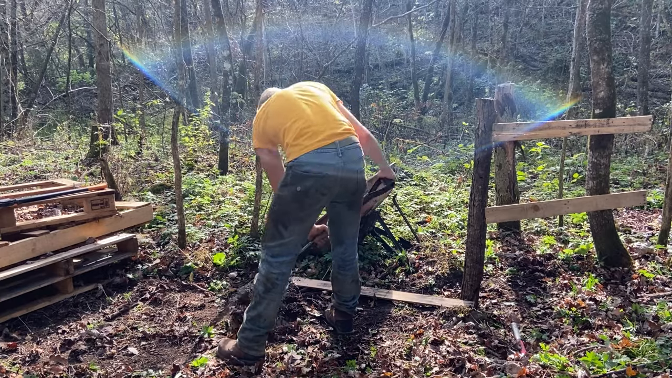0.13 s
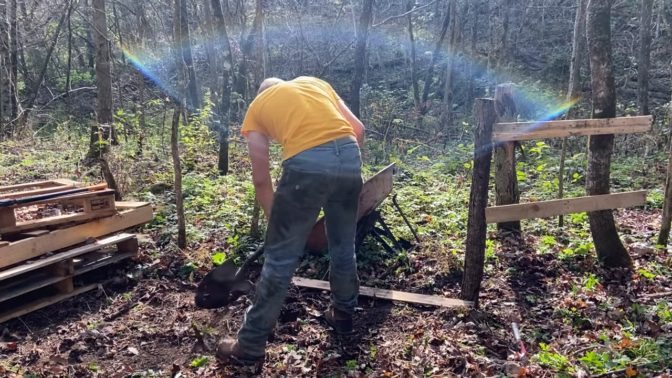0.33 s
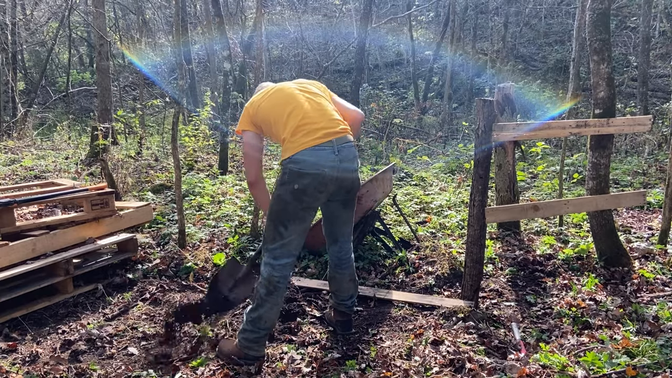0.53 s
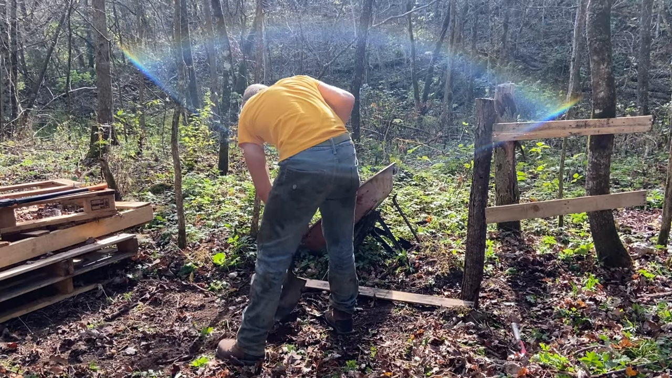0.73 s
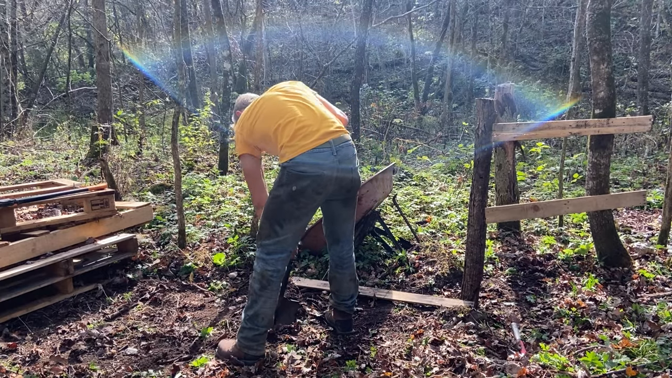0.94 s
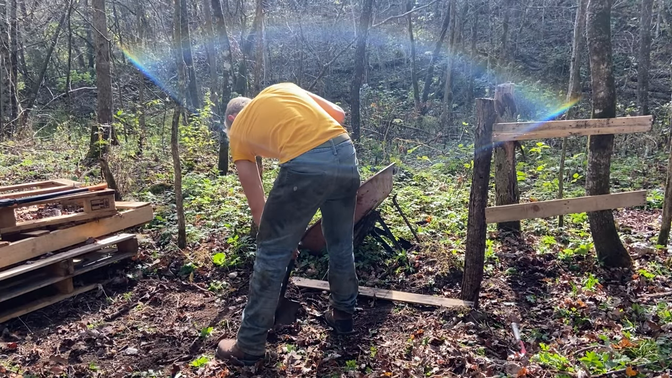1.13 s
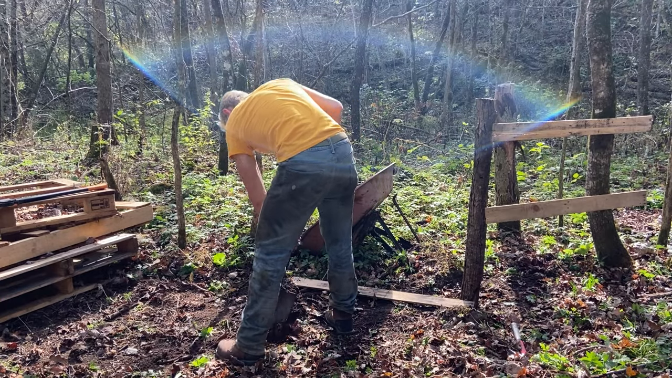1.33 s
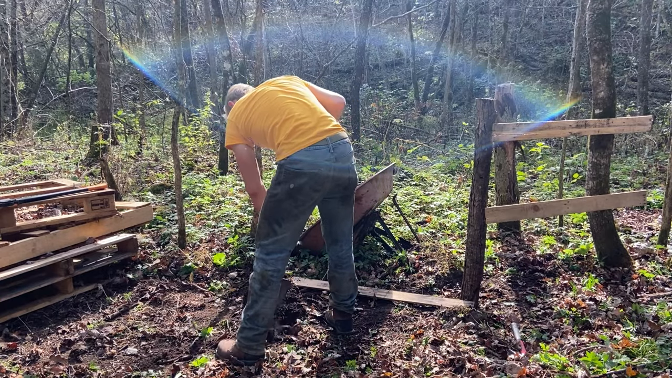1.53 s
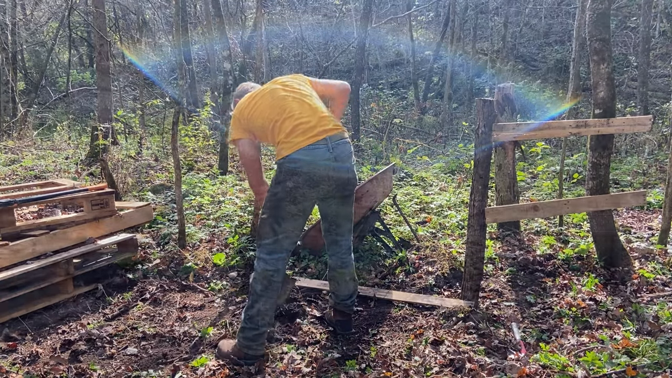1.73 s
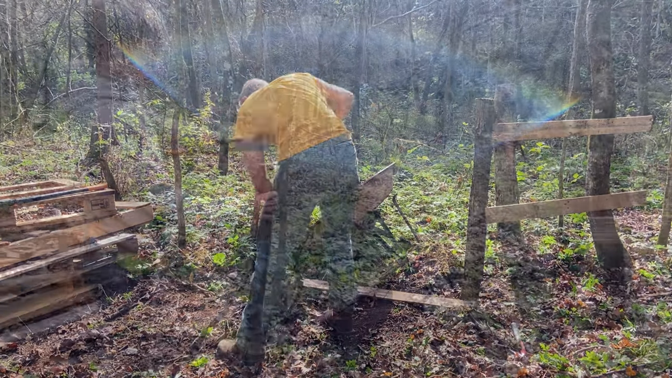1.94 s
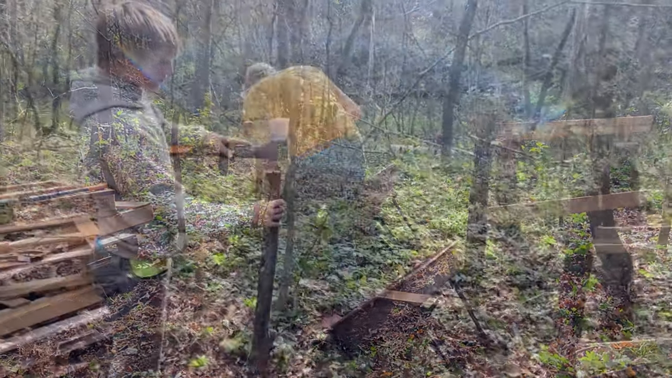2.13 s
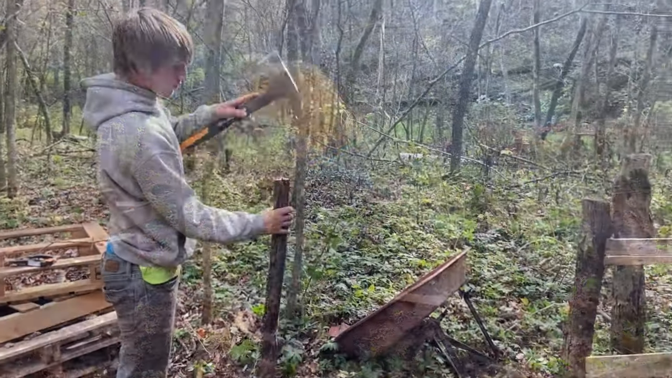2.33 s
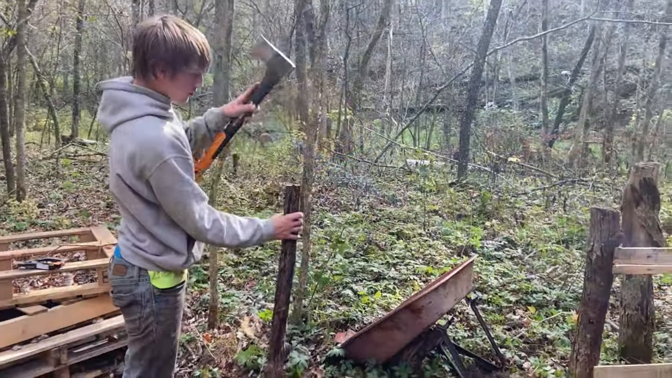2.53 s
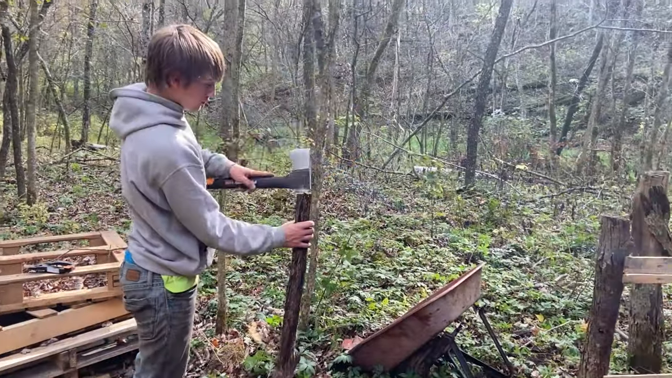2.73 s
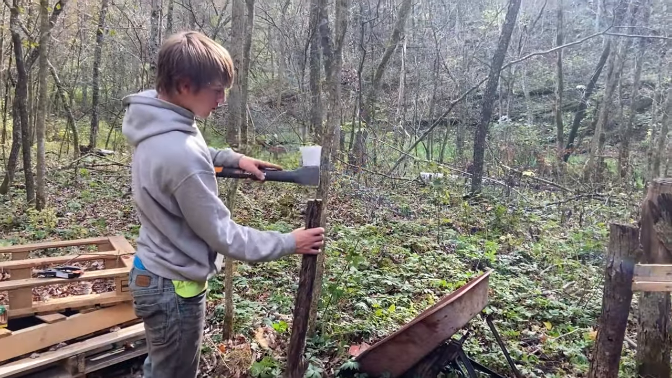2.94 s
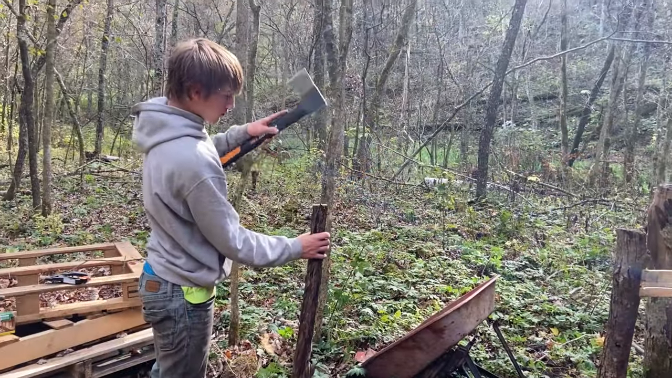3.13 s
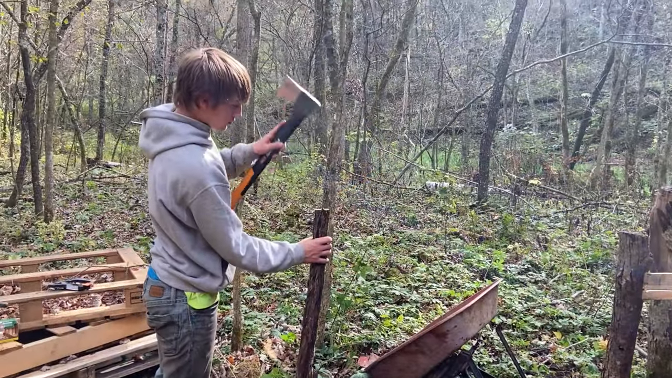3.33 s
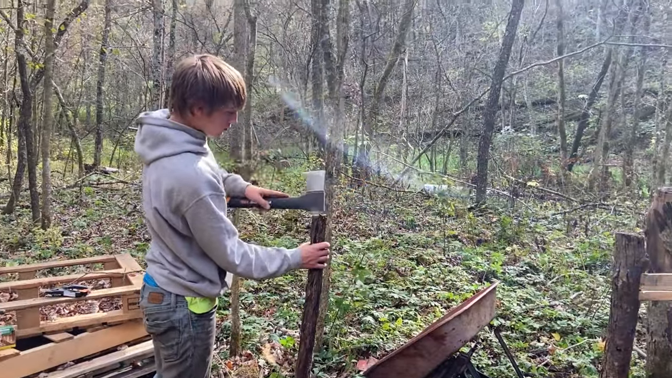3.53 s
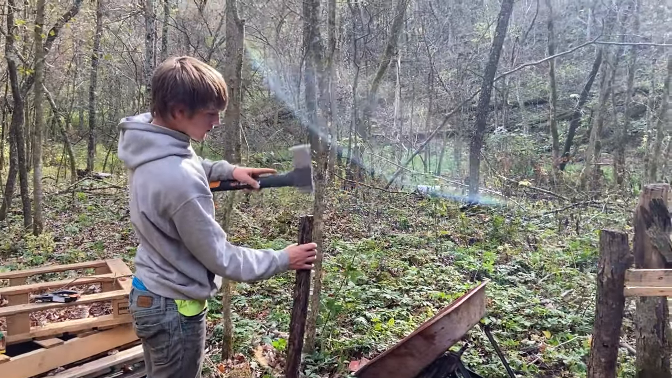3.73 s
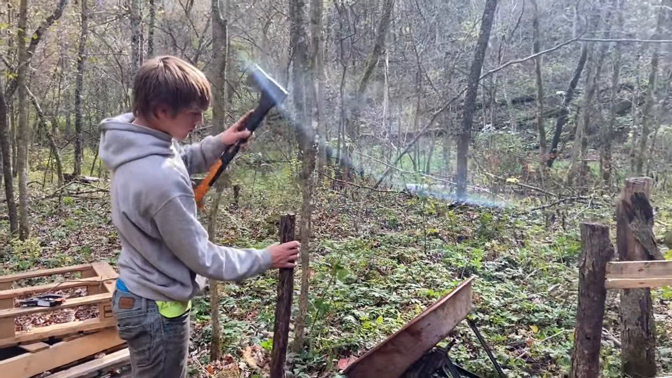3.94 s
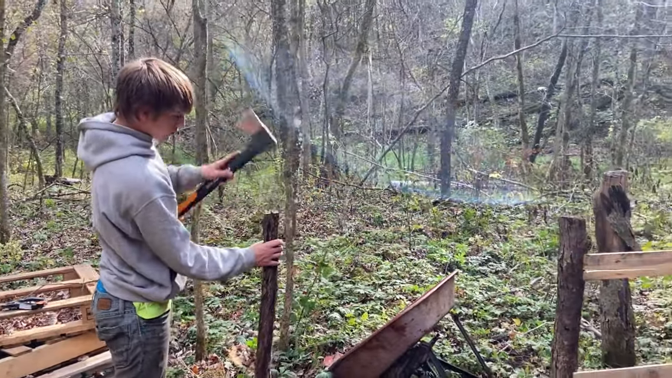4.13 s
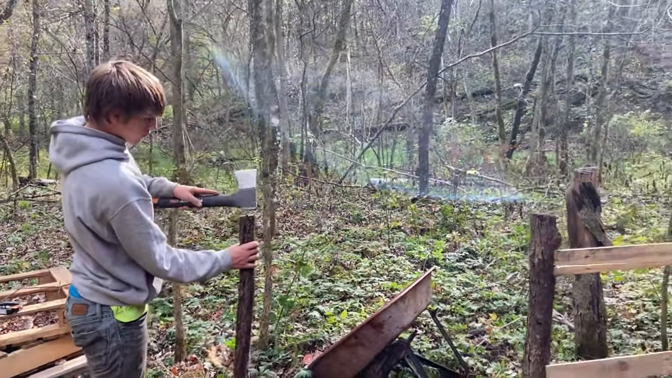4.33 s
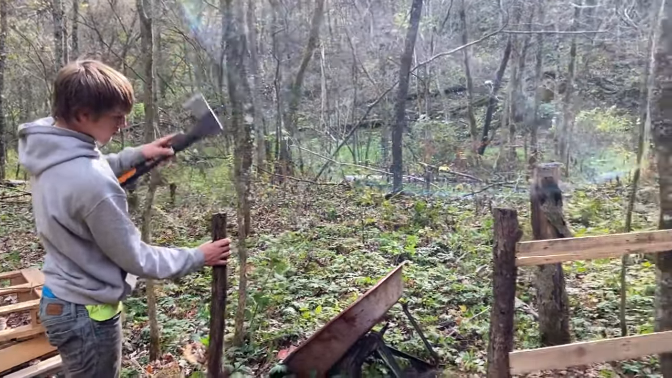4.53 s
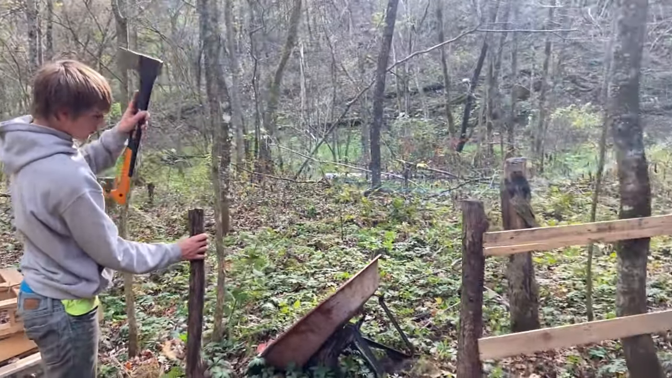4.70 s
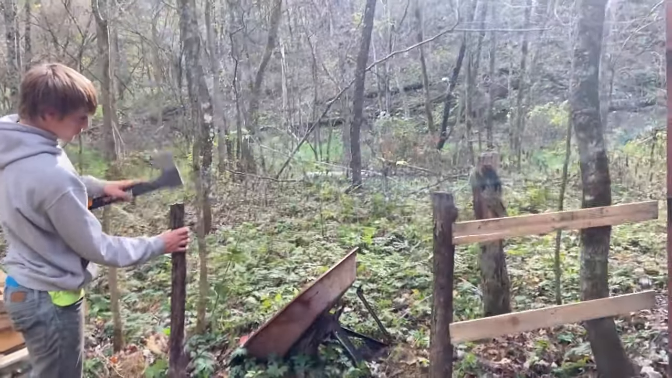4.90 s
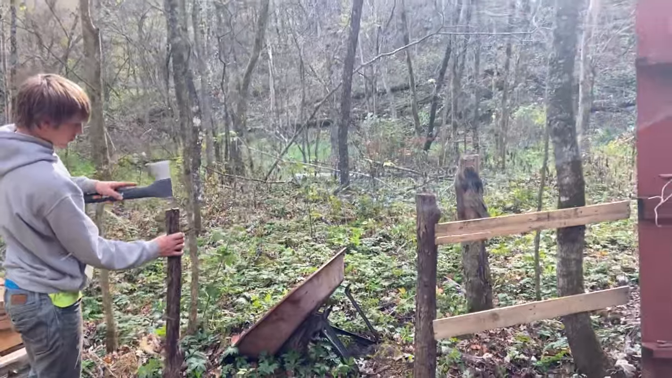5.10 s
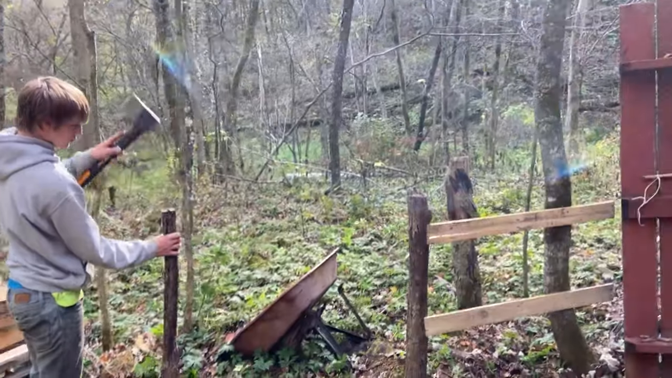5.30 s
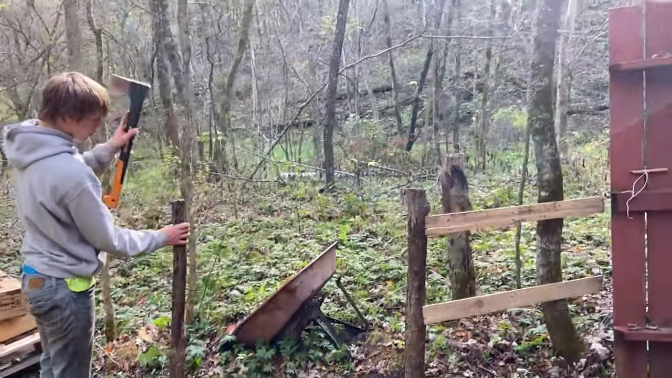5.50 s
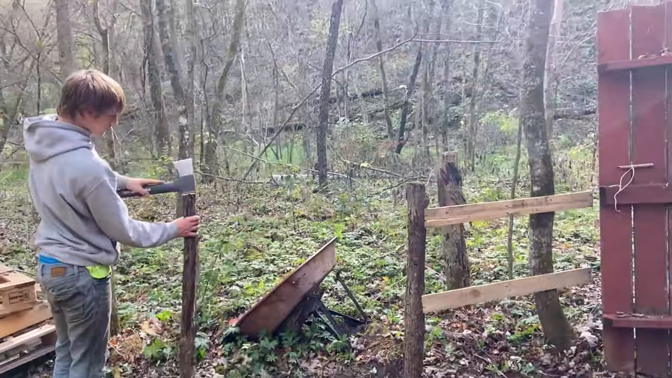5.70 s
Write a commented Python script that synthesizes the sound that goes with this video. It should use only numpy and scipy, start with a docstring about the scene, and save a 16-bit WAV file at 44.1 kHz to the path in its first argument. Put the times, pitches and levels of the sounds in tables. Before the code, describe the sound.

A spade thuds once into soil among softly rustling dry leaves. Then a hatchet drives a wooden post with six evenly paced blows, the first softer, each a sharp knock with a brief woody ring and a thin echo off the trees. Between them, feet and tools stir leaves, snap twigs and bump hollow wood. The stereo microphone is close, with a faint distant rumble behind.

```python
"""A hatchet drives a wooden post with six blows, close to a stereo microphone in a wood.
Each blow rings the post briefly, a low wave follows through the ground and the trunks scatter
a thin tail. Before the first blow a spade thuds into soil. Feet and tools rustle dry leaves,
snap twigs and knock on hollow wood, over a low distant rumble."""
import sys
import numpy as np
from scipy import signal
from scipy.fft import rfft, irfft, next_fast_len
from scipy.io import wavfile

SR = 44100
rng = np.random.default_rng(int(sys.argv[2]) if len(sys.argv) > 2 else 0)


def persist_wave(psi):
    """Save psi, clipped to +-1, as 16-bit WAV."""
    counts = np.round(np.clip(psi, -1, 1) * 32767).astype(np.int16)
    wavfile.write(sys.argv[1], SR, np.atleast_2d(counts).T)


N = 258426

# the ambience of the place: time_s, leaves_db, dragging_db, rumble_db, leaves_pan_db
AMBIENCE = [(0, -72, -63.5, -63, -1.5), (.9, -64.5, -64.5, -61, -0.5), (1.1, -75, -63.5, -61.5, -3),
            (1.4, -66.5, -64.5, -61.5, -1), (1.75, -76, -66.5, -63.5, -3), (2.1, -68, -69, -67.5, -1),
            (2.5, -69.5, -65, -61, -2), (3.0, -71.5, -66, -58.5, -3.5), (3.5, -68.5, -65, -56.5, -2.5),
            (4.0, -74.5, -65, -53.5, -3.5), (4.55, -62.5, -55.5, -55.5, -6.5), (5.1, -63.5, -57.5, -60, -3),
            (5.5, -53.5, -60.5, -52.5, -4), (5.86, -65, -54.5, -51.5, -3.5)]


def from_db(db):
    """Decibels to gain."""
    return 10 ** (np.asarray(db) / 20)


def rms_one(x):
    """Scale to rms 1."""
    return x / np.sqrt(np.mean(x ** 2) + 1e-20)


def at_peak(x, db):
    """Scale to a peak of db."""
    return from_db(db) * x / np.abs(x).max()


def high_pass(x, hz):
    """Cut below hz."""
    return signal.sosfilt(signal.butter(2, hz, "high", fs=SR, output="sos"), x)


def band_pass(x, low_hz, high_hz, order):
    """Keep what lies between two frequencies."""
    edges = [low_hz, min(high_hz, .45 * SR)]
    return signal.sosfilt(signal.butter(order, edges, "band", fs=SR, output="sos"), x)


def in_time(rows):
    """Read (time_s, value, ..) rows as curves, one value a sample."""
    times, *columns = np.transpose(rows)
    return [np.interp(np.arange(N) / SR, times, c) for c in columns]


def at_hz(rows, hz):
    """Read (frequency_hz, value, ..) rows on a log-frequency axis."""
    freqs, *columns = np.transpose(rows)
    return np.squeeze([np.interp(np.log(hz), np.log(freqs), c) for c in columns])


def add(out, start_s, sound, pan_db=0):
    """Mix a sound in; pan_db is left minus right."""
    at = round(start_s * SR)
    part = sound[:N - at]
    out[:, at:at + len(part)] += part * from_db([[pan_db / 2], [-pan_db / 2]])


def drift(rate_hz):
    """A smooth random wander of rms 1."""
    pole = np.exp(-80 * np.pi * rate_hz / SR)
    white = rng.standard_normal(N // 40 + 2002)
    slow = signal.lfilter([1], [1, -2 * pole, pole * pole], white)[2000:]
    return np.interp(np.arange(N) / 40, np.arange(len(slow)), rms_one(slow))


def bands(low_hz, high_hz, size):
    """Yield the centre, a mid noise and a side noise for each half-octave band."""
    edges = low_hz * 2 ** np.arange(0, np.log2(high_hz / low_hz) + .5, .5)
    white = rng.standard_normal((2, 2, size))
    for k, (low, high) in enumerate(zip(edges, np.minimum(edges[1:], .45 * SR))):
        yield np.sqrt(low * high), *band_pass(white[k % 2], low, high, order=2)


def spread(mid, side, hz, pan_db=0):
    """Mid and side to left and right; direction shows where the microphone body shades a port."""
    # the microphone's stereo image: frequency_hz, left_right_likeness, pan_factor
    image = [(60.4, 1, 0), (300, 0.51, 0.3), (1200, 0.19, 2), (2320, 0.77, 1.75), (3500, 0.39, 0.8846),
             (5475, 0.12, 5), (7270, 1, -1), (14000, 1, 0.03)]
    alike, pan_factor = at_hz(image, hz)
    pair = np.sqrt(1 + alike) * mid + np.sqrt(1 - alike) * side * [[1], [-1]]
    return pair * from_db(np.outer([.5, -.5], pan_factor * pan_db))


def noise(spectrum, patchy_db, grain_db, pan_db=0):
    """Stereo noise of rms 1 with slow patches in each band and a shared fast crackle."""
    out, crackle = 0, drift(rate_hz=210)
    for hz, mid, side in bands(spectrum[0][0], spectrum[-1][0], size=N):
        level_db = at_hz(spectrum, hz) + patchy_db * drift(rate_hz=10.5) + grain_db * crackle
        out = out + from_db(level_db) * spread(mid, side, hz, pan_db)
    return rms_one(out)


def burst(hz, decay_s, rise_s, width=2.2):
    """A crunch of noise from hz / width to hz * width, with the energy of rms 1 held for decay_s."""
    t = np.arange(SR // 10) / SR
    envelope = (1 - np.exp(-t / rise_s)) * np.exp(-t / decay_s)
    grit = band_pass(rng.standard_normal(len(t)) * envelope, hz / width, hz * width, order=1)
    return grit / np.sqrt(np.sum(grit ** 2) / (decay_s * SR))


def ring(force, hz, t60_s):
    """One mode: a unit click sets off a dying sine of height about 1."""
    pole, angle = from_db(-60 / (t60_s * SR)), 2 * np.pi * hz / SR
    return signal.lfilter([0, np.sin(angle)], [1, -2 * pole * np.cos(angle), pole * pole], force + 1e-18)


def struck(modes, contact_s, jolts_db, scatter_db, detune):
    """A few jolts drive every mode; grip and spot shift strengths and pitches from blow to blow."""
    force = np.zeros(SR // 2)
    jolt_at = (np.linspace(0, contact_s, len(jolts_db)) * SR).astype(int)
    force[jolt_at] = from_db(jolts_db)
    force = signal.lfilter([.3], [1, -.7], force)
    body = 0
    for k, (hz, db, t60_s) in enumerate(modes):
        louder, higher = rng.standard_normal(2)
        mode = ring(force, hz * (1 + detune * higher), t60_s)
        body = body + (-1) ** k * from_db(db + scatter_db * louder) * mode
    return high_pass(body, 170)   # a small body radiates no deep bass


def distant_rumble():
    """Low noise from far off, slowly rising and falling."""
    # rumble spectrum: frequency_hz, relative_density_db
    spectrum = [(40, -10.5), (52, -0.5), (65, -4), (87, -3.5), (110, -6.5), (200, -16), (400, -25)]
    _, _, rumble_db, _ = in_time(AMBIENCE)
    return from_db(rumble_db) * noise(spectrum, patchy_db=1.5, grain_db=2.5)


def woodland_echo(x):
    """Near trunks return a quick dense scatter, far ones a longer tail, a stack of boards one slap."""
    # scatter off the trunks: frequency_hz, near_db, near_t60_s, far_db, far_t60_s
    trunks = [(200, -50, .1, -61.5, 0.967), (505, -42, 0.15, -71, 1), (985, -54.5, 0.13, -63.5, 0.83),
              (1460, -37.5, .1, -63.5, .84), (2010, -43.5, 0.094, -66, 0.95),
              (3200, -36.5, 0.085, -60, 0.8), (5000, -37.5, 0.082, -58.5, .45),
              (8000, -36.5, 0.1, -61, .35), (12100, -35.5, 0.077, -66.5, .3)]
    t, echo = np.arange(SR) / SR, 0
    for hz, mid, side in bands(165, 14000, size=SR):
        near_db, near_t60, far_db, far_t60 = at_hz(trunks, hz)
        near = from_db(near_db - 60 * t / near_t60) * (t > .006)   # first echo after 6 ms
        far = from_db(far_db - 60 * t / far_t60) * np.minimum(t / 0.076, 1) ** 2
        echo = echo + (near + far) * spread(mid, side, hz=940)   # equally wide in every band
    slap = from_db(-38) * ring(signal.unit_impulse(400), hz=1500, t60_s=0.002)
    add(echo, start_s=.018, sound=slap, pan_db=6.5)
    return signal.fftconvolve(high_pass(x, 180)[None], echo, axes=1)[:, :N]


def rustle():
    """Feet and tools sweep the woodland floor, stirring bright leaves and duller dragging together."""
    # spectra of dry leaves and of dragging: frequency_hz, relative_density_db
    leaf_spectrum = [(1000, 3.5), (2000, 4.5), (3500, 2), (5200, 1.5), (7000, 2), (9200, 8), (11500, -21.5),
                     (13500, -12), (15500, -20)]
    drag_spectrum = [(150, 1), (300, 1), (520, 2.5), (750, -0.5), (1050, 0.5), (1600, -10), (2600, -17.5),
                     (4000, -27)]
    # sweeps: time_s, leaves_db, dragging_db, rise_s, fall_s (per 20 dB; a negative fall keeps growing)
    sweeps = [(0.365, -50.5, -63.5, 0.2237, 0.21), (0.581, -52, -74.5, 0.2928, 0.247),
              (0.675, -48.5, -69.5, 0.1242, 0.0213), (1.191, -60.5, -61.5, 0.1143, 0.0756),
              (1.48, -63.5, -68.5, 0.22, 0.01), (2.17, -58, -76, 0.0538, 0.27),
              (2.28, -59.5, -70.5, 0.135, .12), (3.901, -62, -62.5, 0.17, 0.04),
              (4.06, -60, -66.5, 0.1061, 0.5), (4.39, -46.5, -52, 0.1376, 0.19),
              (4.46, -50, -54.5, 0.08, 0.0747), (4.662, -44.5, -51.5, 0.13, 0.1759),
              (4.778, -50.5, -49.5, 0.1142, 0.27), (5.05, -57, -67, 0.06, 0.53),
              (5.25, -53.5, -50, 0.18, 0.2559), (5.419, -47.5, -50, 0.34, 0.18),
              (5.61, -48.5, -55.5, 0.0436, 0.26), (5.759, -52.5, -57.5, 0.2965, -2.54)]
    leaf_db, drag_db, _, pan_db = in_time(AMBIENCE)
    t = np.arange(N) / SR
    powers = from_db([leaf_db, drag_db]) ** 2
    for time_s, *levels_db, rise_s, fall_s in sweeps:
        swell_db = -20 * np.maximum((time_s - t) / rise_s, (t - time_s) / fall_s)
        powers = powers + from_db(np.add.outer(levels_db, swell_db)) ** 2
    leaf_gain, drag_gain = np.sqrt(powers)
    leaves = leaf_gain * noise(leaf_spectrum, patchy_db=1.2, grain_db=1.5, pan_db=pan_db)
    dragging = drag_gain * noise(drag_spectrum, patchy_db=1.0, grain_db=2.0)
    return leaves + dragging


def twigs():
    """Twigs snap and leaves crunch underfoot, a little to the right, among fainter random ticks."""
    # snaps and crunches: start_s, peak_db, centre_hz, decay_s
    snaps = [(0.840, -44.5, 2060, 0.0154), (1.1573, -43.5, 2380, 0.0088), (1.1917, -50.5, 2010, 0.0074),
             (1.2146, -50.5, 2440, 0.0089), (1.3493, -50.5, 6360, 0.0043), (1.4895, -47.5, 1910, 0.0097),
             (1.558, -60, 4000, 0.0061), (2.1311, -51.5, 7170, 0.0063), (2.379, -42.5, 1530, 0.0102),
             (2.4209, -42, 2230, 0.0056), (2.5142, -42.5, 2380, 0.0053), (2.5204, -46, 1540, 0.0052),
             (3.0485, -51, 5350, 0.003), (3.0684, -47.5, 2690, 0.0018), (3.1224, -53.5, 5790, .002),
             (3.1318, -51, 7030, 0.00249), (3.2034, -56.5, 4000, .002), (3.3059, -45.5, 3220, 0.00136),
             (3.3454, -57, 4200, 0.00229), (3.8003, -43.5, 3500, 0.00174), (3.8327, -50.5, 2400, .004),
             (3.8836, -43, 2550, 0.0037), (3.904, -48, 1340, .008), (4.0392, -49, 3450, 0.00236),
             (4.6538, -36.5, 5170, .004), (4.7706, -37.5, 4500, 0.0031), (5.2794, -36.5, 1470, 0.0036),
             (5.4086, -34.5, 2080, 0.0047), (5.5374, -41, 1820, 0.0032)]
    out, ticks_per_s = np.zeros((2, N)), 5.6
    chance = rng.random((round(ticks_per_s * N / SR), 3))
    ticks = [(when * N / SR, -67 + 8 * size, 2500 * 3.0 ** pitch, .0012) for when, size, pitch in chance]
    for start_s, peak_db, hz, decay_s in [*snaps, *ticks]:
        snap = burst(hz, decay_s, rise_s=.001, width=1.5)
        add(out, start_s, at_peak(snap, peak_db), pan_db=-2)
    return out


def hollow_knocks():
    """A rough contact rings one mode of hollow wood."""
    # knocks of feet and tools: start_s, peak_db, pitch_hz
    knocks = [(0.84, -43, 188), (1.156, -51.5, 593.5), (1.211, -49, 596), (1.503, -50, 204),
              (2.425, -48, 506), (2.519, -51, 479.7), (3.725, -48.5, 556), (3.834, -46, 557.4),
              (3.904, -45, 558), (3.898, -42.5, 142.7), (4.045, -49.5, 520), (4.113, -53.5, 560),
              (4.531, -44.5, 597), (4.757, -44.5, 495), (4.826, -39.5, 503), (4.844, -44, 476),
              (5.215, -45.5, 541), (5.278, -42.5, 520.5), (5.367, -43.5, 549)]
    out = np.zeros((2, N))
    for start_s, peak_db, hz in knocks:
        contact = burst(hz, decay_s=0.0098, rise_s=0.004, width=1.8)
        add(out, start_s, at_peak(ring(contact, hz, t60_s=0.05), peak_db))
    return out


def ground_wave(rise_s, start_hz, end_hz, fall_s, t60_s):
    """Soil carries the highs first: a late swell whose pitch falls."""
    t = np.arange(SR // 2) / SR
    turns = end_hz * t + (start_hz - end_hz) * fall_s * (1 - np.exp(-t / fall_s))
    swell = (1 - np.exp(-(t / rise_s) ** 2)) * from_db(-60 * t / t60_s)
    return swell / swell.max() * np.sin(2 * np.pi * turns)


def spade():
    """A thud into earth: dull blade modes, crushed soil, grit on the edge and a ground wave."""
    # spade and heels in soil: start_s, peak_db, grit_db, ground_db
    thuds = [(0.841, -50.5, -50.5, -68), (0.949, -10.5, -49, -39), (1.492, -38.5, -74, -60.5),
             (5.45, -70.5, -55, -53.5)]
    # modes of the blade: pitch_hz, relative_db, t60_s
    blade_modes = [(205.2, 3.5, 0.0407), (340.3, 6, 0.0289), (416.3, 10.5, 0.0185), (569, -4, 0.0278),
                   (871, -7, 0.0393), (1083, -8, 0.033), (1417, -16, 0.03), (1876, -34, 0.036),
                   (2530, -37, 0.02)]
    out = np.zeros((2, N))
    wave = ground_wave(rise_s=0.021, start_hz=233.2, end_hz=78.5, fall_s=0.01755, t60_s=0.104)
    for start_s, peak_db, grit_db, ground_db in thuds:
        blade = struck(blade_modes, contact_s=0.002873, jolts_db=[-10, -3, 0], scatter_db=3, detune=0.0296)
        soil = burst(hz=370, decay_s=0.0082, rise_s=0.00074)
        grit = burst(hz=7100, decay_s=0.00366, rise_s=0.0012)
        add(out, start_s, at_peak(blade, peak_db))
        add(out, start_s + 0.002023, from_db(peak_db - 24) * soil)
        add(out, start_s, from_db(grit_db) * grit)
        add(out, start_s, from_db(ground_db) * wave)
    return out


def post(ring_db, upper_db, middle_db, lower_db, crack_db):
    """One contact: a splintering crack and four mode groups, each as strong as the spot struck allows."""
    # modes of the post: pitch_hz, relative_db, t60_s
    lengthwise = [(1045, 0, .034), (1115, -12, .03)]   # the main ring, split in two by the grain
    upper = [(1329.3, -3, 0.02), (1681.8, 5, 0.0086), (1964.5, -4.5, 0.017), (2234.6, -4, 0.014),
             (2619, -4.5, 0.022), (3308, -11.5, 0.0087), (3697, -14.5, .01), (4500, -24, .01)]
    middle = [(654, -0.5, 0.022), (816, -5.5, 0.028)]
    lower = [(307.2, -1, 0.029), (359.3, 1.5, 0.044), (516, -6.5, 0.078)]
    sound = np.zeros(SR // 2)
    crack = burst(hz=2400, decay_s=0.0025, rise_s=0.0023)
    sound[:len(crack)] = from_db(crack_db) * signal.lfilter([.6], [1, -.4], crack)
    # low modes follow the growing force, high ones its first edge
    pressing_db, biting_db = [-20.0, -9, -2.5, 0.96], [-31.5, 5.5, 3.5, -1.5]
    groups = ((lengthwise, ring_db, pressing_db, .005), (upper, upper_db, biting_db, .03),
              (middle, middle_db, pressing_db, .02), (lower, lower_db, pressing_db, .03))
    for modes, peak_db, jolts_db, detune in groups:
        group = struck(modes, contact_s=.0029, jolts_db=jolts_db, scatter_db=1.5, detune=detune)
        sound += at_peak(group, peak_db)
    return sound


def hatchet():
    """Blows just left of centre ring and sway the post and shake the ground; bounces only tap it."""
    # blows: start_s, ring_db, upper_db, middle_db, lower_db, crack_db, sway_db, ground_db
    blows = [(1.985, -21, -21, -18, -27.5, -44.5, -41.5, -48),
             (2.6913, -6, -5.5, -7, -20.5, -19, -34, -33.5),
             (3.455, -3.5, -5.5, -14.5, -19, -25.5, -38.5, -31),
             (4.1919, -3, -6.5, -11, -21.5, -23, -41.5, -29.5),
             (4.9168, -6, -4.5, -11.5, -20.5, -19.5, -45.5, -26.5),
             (5.6496, -7.5, -7, -8.5, -22.5, -22, -37, -22.5)]
    # the head falls back on the post: start_s, ring_db, upper_db, middle_db, lower_db, crack_db
    bounces = [(3.4709, -45, -23, -29.5, -30, -66), (3.519, -35.5, -47.5, -39.5, -44, -63)]
    out, t = np.zeros((2, N)), np.arange(SR // 2) / SR
    sway_hz, sway_rise_s, sway_t60_s = 186, 0.051, 0.33
    sway_envelope = np.minimum(t / sway_rise_s, 1) * from_db(-60 * t / sway_t60_s)
    sway = sway_envelope * np.sin(2 * np.pi * sway_hz * t)
    wave = ground_wave(rise_s=.027, start_hz=290, end_hz=67, fall_s=.012, t60_s=0.11)
    for start_s, *wood_db, sway_db, ground_db in blows:
        add(out, start_s, post(*wood_db) + from_db(sway_db) * sway, pan_db=1.9)
        add(out, start_s, from_db(ground_db) * wave, pan_db=2.5)
    for start_s, *wood_db in bounces:
        add(out, start_s, post(*wood_db))
    return out


def scene():
    """Close blows and their echo off the trunks, over rustle and distant rumble."""
    rumble = distant_rumble()
    hits = hatchet() + spade() + twigs() + hollow_knocks()
    return hits + woodland_echo(hits.mean(axis=0)) + rustle() + rumble


def record(dry):
    """The microphone cuts deep bass, slips its two ports apart in phase, rounds peaks and cuts the top."""
    # phase between the ports: frequency_hz, left_lead_rad
    port_phase = [(100, .8), (400, .6), (1000, .35), (2400, 0.), (5500, -.5), (6600, 0.), (7600, 1.7),
                  (8500, 3.0), (9700, 3.3), (10700, 4.8), (11700, 6.2), (13000, 6.4), (14500, 9.3),
                  (16000, 9.5)]
    size, cutoff_hz = next_fast_len(N + 4096), 16300
    hz = np.maximum(np.arange(size // 2 + 1) * SR / size, 1)
    phase_slip = np.exp(.5j * np.outer([1, -1], at_hz(port_phase, hz)))
    low_cut = high_pass(high_pass(dry, 36), 36)
    ports = irfft(rfft(low_cut, size) * phase_slip, size)[:, :N]
    rounded = 1.5 * np.tanh(ports / 1.5)
    return signal.sosfilt(signal.cheby2(12, 70, cutoff_hz, fs=SR, output="sos"), rounded)


dry = scene()
out = record(dry)
persist_wave(out)
```